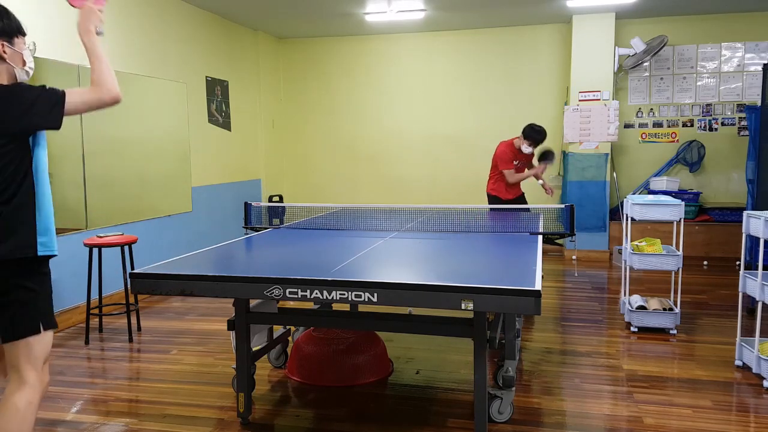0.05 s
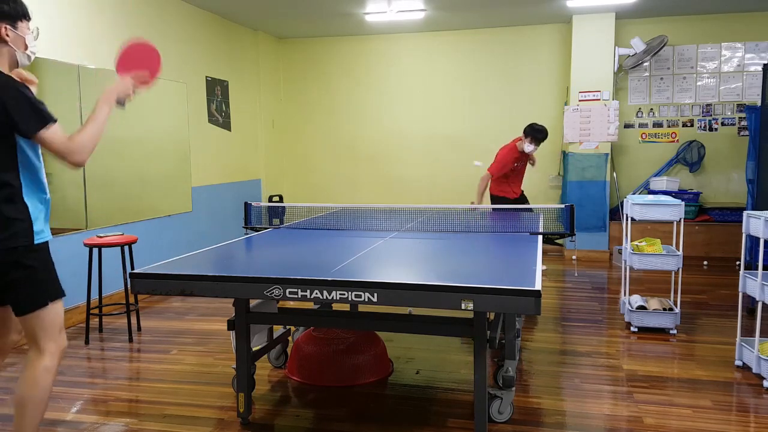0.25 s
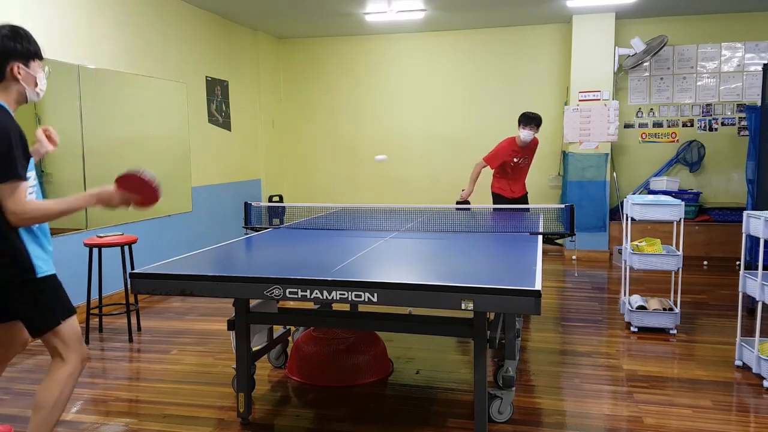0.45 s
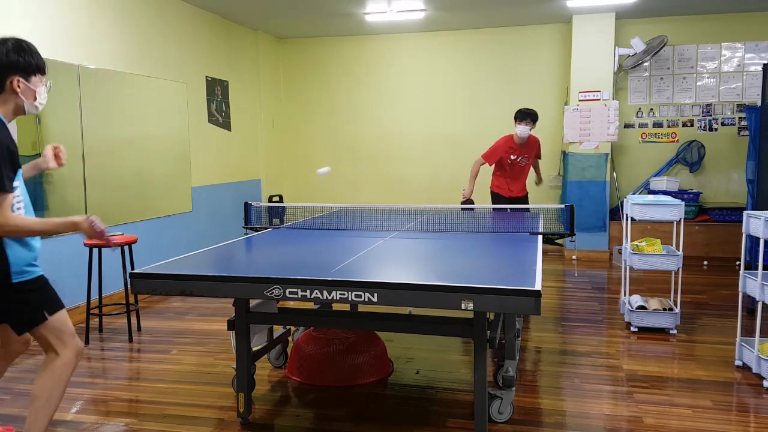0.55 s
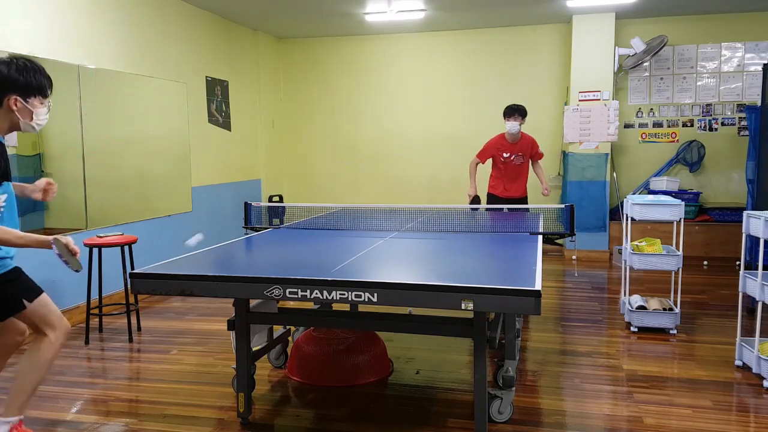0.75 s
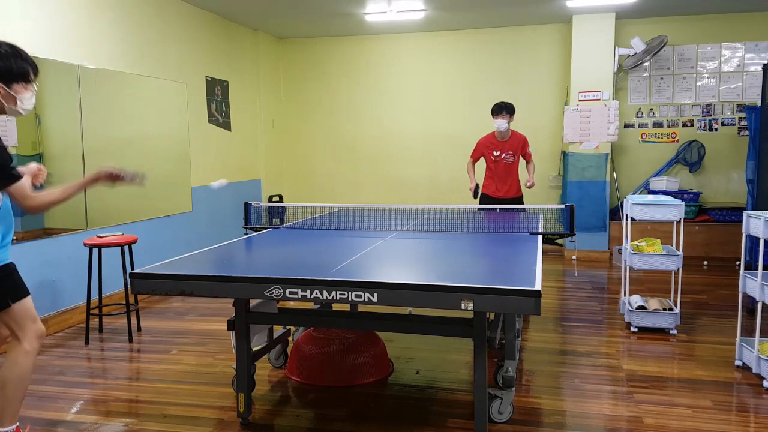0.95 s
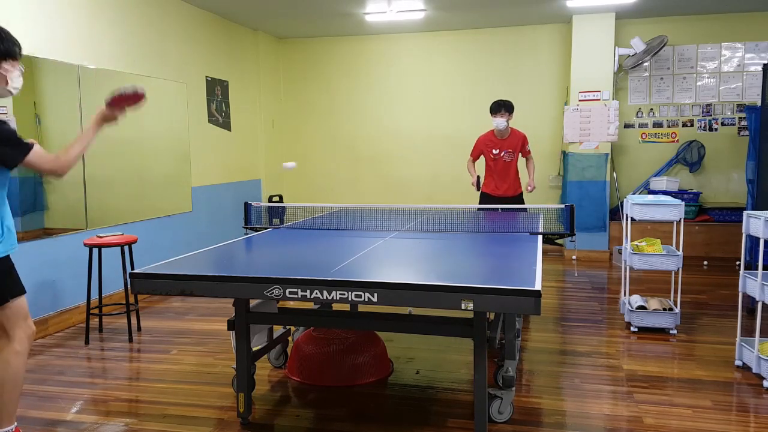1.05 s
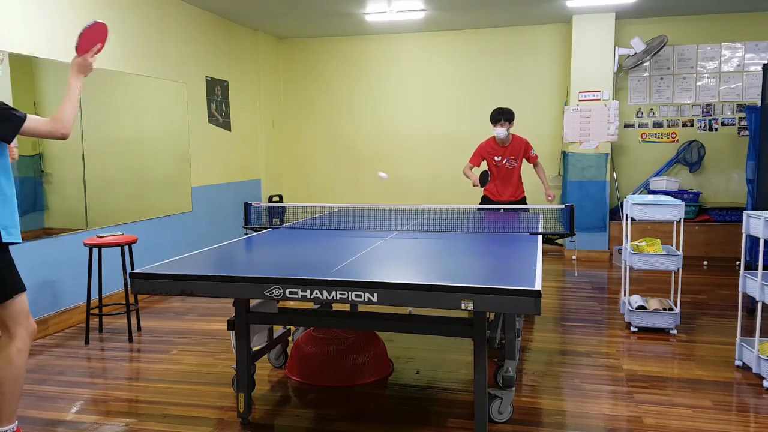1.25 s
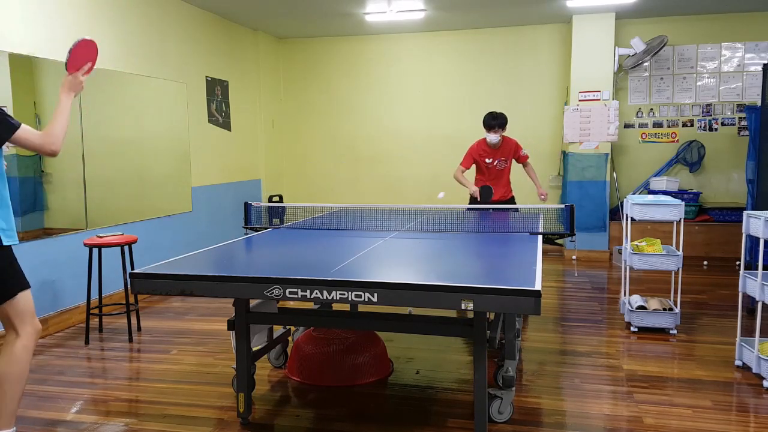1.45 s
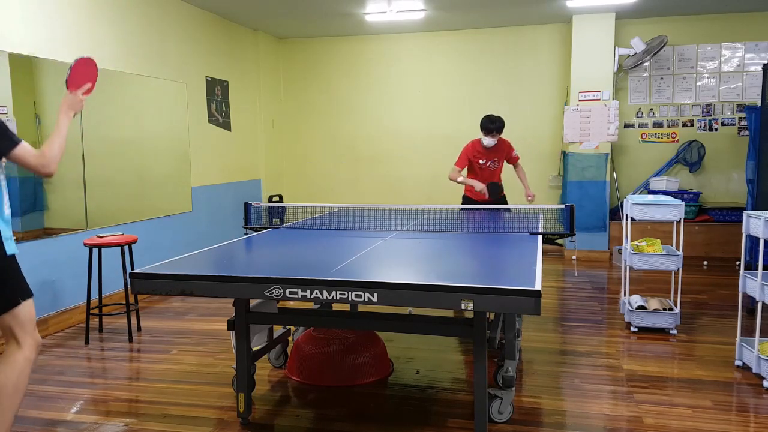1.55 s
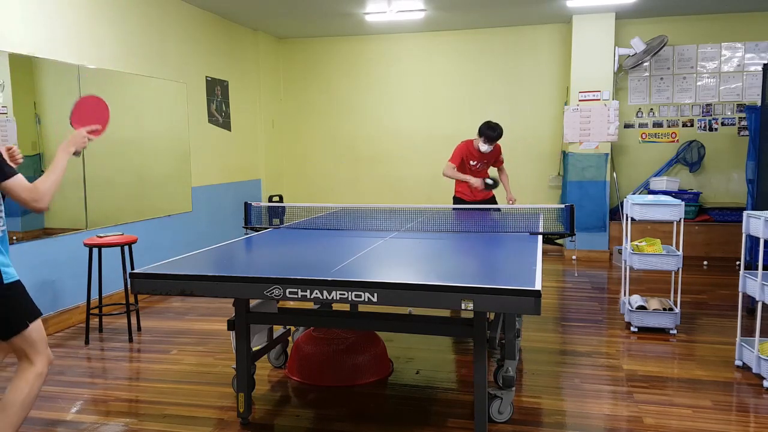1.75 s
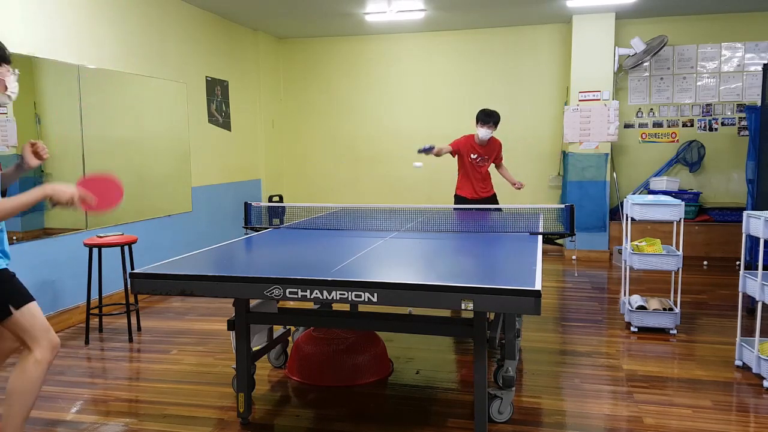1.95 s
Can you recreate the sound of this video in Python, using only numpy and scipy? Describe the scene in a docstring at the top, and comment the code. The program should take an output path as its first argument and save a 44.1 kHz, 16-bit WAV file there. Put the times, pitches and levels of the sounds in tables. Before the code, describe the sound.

A table tennis ball clicks off paddles and bounces on the table, three strokes in a steady rally. Feet stamp on a wooden floor, first farther away, then close by. Everything echoes in a hard-walled hall.

```python
"""A table tennis ball is hit back and forth: it knocks on table and paddles, and its thin shell pings.
The players stamp with their strokes, which sets the sprung wooden floor booming, and their rubber
soles slide softly on the varnish. Under it all lies the low rush of the room.
Most of the sound arrives as the echo of the hard-walled practice hall."""
import sys
import numpy as np
from scipy import signal
from scipy.fft import rfft, irfft, next_fast_len
from scipy.io import wavfile
from scipy.ndimage import uniform_filter1d, minimum_filter1d

SR = 44100
rng = np.random.default_rng(int(sys.argv[2]) if len(sys.argv) > 2 else 0)


def unload_audio(sound):
    """Save the sound as a 16-bit wav file, at the path given as the first command line argument."""
    columns = np.transpose(np.atleast_2d(sound))
    # keep every value between -1 and 1, then stretch to whole-number steps
    steps = np.round(np.clip(columns, -1, 1) * 32767)
    wavfile.write(sys.argv[1], SR, steps.astype(np.int16))


N = 88200
LEAD_IN, TAIL = SR // 4, SR * 3 // 2  # samples: room before time zero, length of a ring-out


def amp(db):
    """Turn decibels into a gain."""
    return 10 ** (np.asarray(db) / 20)


def unit(x):
    """Scale a sound to an energy of 1."""
    return x / np.sqrt(np.sum(x ** 2) + 1e-20)


def along(points, hz):
    """Read a curve of (Hz, value) points at the given pitches."""
    f, v = np.transpose(points)
    return np.interp(np.log(hz + 1), np.log(f + 1), v)


def add(track, s, sound):
    """Mix a stereo sound in at s seconds."""
    rest = track[:, LEAD_IN + round(s * SR):][:, :sound.shape[1]]
    rest += sound[:, :rest.shape[1]]


def knock(tone, size=4096):
    """One sharp knock whose tone follows a curve of (Hz, dB) points."""
    cepstrum = irfft(np.log(amp(along(tone, np.fft.rfftfreq(size, 1 / SR)))))
    cepstrum[1:size // 2] *= 2  # folding it in half packs the energy at the start
    cepstrum[size // 2 + 1:] = 0
    return unit(irfft(np.exp(rfft(cepstrum))))


def ring(notes, size, scatter_db=.8):
    """A struck object rings with fading notes, their levels a little different at each blow."""
    t = np.arange(size) / SR
    return sum(amp(db + scatter_db * rng.normal()) * np.exp(-np.log(1000) * t / fade_s)
               * np.sin(2 * np.pi * hz * t) for hz, db, fade_s in notes)


# How the hall reaches the ears. Each row: pitch in Hz, how alike both ears are (1 is the same).
EAR_LIKENESS = [(100, 0.97), (250, .87), (500, 0.81), (1000, -0.026), (2000, -0.077), (4000, 0.051),
                (9000, -0.049)]
# The hall's lean to one side. Each row: pitch in Hz, left level over right in dB.
EAR_BALANCE = [(120, -1.1), (400, 0.1), (2000, 0.64), (9000, 1.5)]
def diffuse(size):
    """Noise from all sides: nearly the same in both ears in the bass, wide in the treble."""
    hz = np.fft.rfftfreq(size, 1 / SR)
    turn = np.arccos(np.clip(along(EAR_LIKENESS, hz), -.99, .99)) / 2
    mid, side = rfft(rng.standard_normal((2, size))) * [np.cos(turn), np.sin(turn)]
    lean = amp(along(EAR_BALANCE, hz) / 2)
    return irfft(np.array([(mid + side) * lean, (mid - side) / lean]), size)


def rush(tone):
    """Steady noise from all sides with the given tone, at an average (rms) level of 1."""
    noise = irfft(rfft(diffuse(N)) * amp(along(tone, np.fft.rfftfreq(N, 1 / SR))), N)
    return noise / noise.std()


# The tone of the quiet room. Each row: pitch in Hz, relative level in dB.
ROOM_TONE = [(20, -25), (60, -3), (130, 0), (300, 1.5), (800, -8), (1600, -13), (3000, -30.5), (7000, -41),
             (16000, -39)]
def room_tone(level_db=-45.5):
    """The room's faint, low, steady rush."""
    return amp(level_db) * rush(ROOM_TONE)


# How long the hall echoes. Each row: pitch in Hz, seconds to fade by 60 dB.
HALL_FADE = [(50, 1.56), (140, 0.88), (300, 1.23), (600, 1.36), (1200, 1.092), (2000, 0.79), (3500, 0.68),
             (7000, 0.64), (10000, 0.47), (15000, 0.39)]
def hall(sound, direct_db, lead_ms=0, table_echo=0):
    """Sound arrives directly, off the walls, as a long wash and, if asked, off the table top."""
    early_db, early_s = -10, .043  # extra strength and life of the dense first echoes
    wall_count, walls_db, table_delay_s = 8, -19, .0022
    hz, t, spectrum = signal.stft(diffuse(TAIL), SR, nperseg=512)
    fade = np.exp(-np.log(1000) * t / along(HALL_FADE, hz)[:, None])
    echo = signal.istft(spectrum * fade, SR)[1] * np.sqrt(2 * np.log(1000) / SR)
    echo *= 1 + amp(early_db) * np.exp(-np.arange(echo.shape[1]) / SR / early_s)
    for delay, ear_gap in zip(rng.uniform(.007, .035, wall_count), rng.uniform(-.0002, .0001, wall_count)):
        echo[[0, 1], [int(delay * SR), int((delay + ear_gap) * SR)]] += amp(walls_db) / wall_count ** .5
    lead = round(lead_ms * SR / 1000)
    for ear, first in enumerate([max(-lead, 0), max(lead, 0)]):
        echo[ear, first] += amp(direct_db)
        echo[ear, first + round(table_delay_s * SR)] += amp(direct_db) * table_echo
    return signal.fftconvolve(sound[None], echo, axes=1)


# The tone of a sliding sole. Each row: pitch in Hz, relative level in dB.
SLIDE_TONE = [(500, -20), (2000, 7.5), (3500, -2.5), (7000, -12.5), (15000, -27)]
# Shoe slides. Each row: loudest moment in seconds, half length in seconds, level in dB.
SLIDES = [(0.17, 0.14, -52.5), (1.448, 0.038, -64.5)]
def shoe_slides():
    """Rubber soles slide on the varnish in soft swells of hiss."""
    t = np.arange(N) / SR
    swells = sum(amp(db) * np.exp(-((t - s) / half) ** 2 / 2) for s, half, db in SLIDES)
    return rush(SLIDE_TONE) * swells


# The floor's notes. Each row: pitch in Hz, relative level in dB, seconds to fade by 60 dB.
FLOOR_NOTES = [(100.3, -11.5, .9), (147, -1, 0.71), (162.2, 7.5, 0.4), (210.9, -5.5, 1),
               (237.3, -8.5, 0.91), (312.4, -14.5, 0.94)]
def floor_boom(rise_s=.018, left_over_right_db=-1.1):
    """The sprung boards swell into a low boom after a stamp."""
    rise = 1 - np.exp(-np.arange(TAIL) / SR / rise_s)
    ears = amp([[left_over_right_db / 2], [-left_over_right_db / 2]])
    return ears * rise * ring(FLOOR_NOTES, TAIL)


def crunch(sound, life_s):
    """Smear a knock into a short run of tiny uneven touches."""
    size = len(sound)
    touches = rng.standard_normal(size) * rng.exponential(size=size)
    touches *= np.exp(-np.arange(size) / SR / life_s)
    return unit(signal.fftconvolve(sound, touches)[:size])


# The tones of a stamp: deep push, thud, sole slap and the grit under each player's shoes.
# Each row: pitch in Hz, relative level in dB.
PUSH_TONE = [(20, -33), (38, -25), (52, -9.5), (85, -1.5), (125, 0), (220, -14.5), (600, -67), (5000, -100)]
THUD_TONE = [(20, -61.5), (90, -6), (140, 4.5), (215, -3), (300, -5.5), (420, -12), (700, -29.5),
             (2000, -43), (10000, -100)]
SLAP_TONE = [(60, -16.5), (300, 1.5), (550, 4.5), (900, 4), (1400, -4.5), (2100, 1), (3000, -15),
             (4500, -18.5), (9000, -40), (16000, -63)]
GRIT_TONES = {"far": [(800, -17.5), (2000, 1.5), (2700, 7.5), (3300, -0.5), (4400, -9.5), (6000, -6.5),
              (8500, -10.5), (11000, -15), (16000, -33)], "near": [(800, -25), (2500, -5), (3600, -1.5),
              (4700, -1.5), (6500, -9.5), (9500, -10.5), (12000, -11), (16000, -23)]}
# How strongly thud and slap arrive directly. Each entry: player, gain in dB.
DIRECT_THUD = {"far": -11.5, "near": -1.5}
DIRECT_SLAP = {"far": -13.5, "near": -8}
# Heels and soles landing. Each row: start in seconds, player, then levels in dB of the
# push, thud, floor boom, slap and grit.
STAMPS = [(0.252, "far", -9, 15.5, -39, 10.5, -8.5), (0.265, "far", -23, 4, -16.5, 12.5, 5.5),
          (0.2732, "far", -9, 18.5, -6.5, 13.5, 6), (.385, "far", 7, 6, -29.5, -21, -52),
          (.835, "near", -21, -16, -36, -40, -48), (.904, "near", 14.5, 16.5, -34, 4.5, -6),
          (0.9096, "near", 11, 15.5, -33, 9.5, -7), (.938, "near", 4.5, 2, -35, 2, -12),
          (0.946, "near", 12.5, 14.5, -28.5, 2.5, -10.5)]
def stamps():
    """A foot pushes the floor, slaps it as the sole rolls down, crunches grit and rings the boards."""
    track = np.zeros((2, LEAD_IN + N))
    push, thud, slap = knock(PUSH_TONE), knock(THUD_TONE), knock(SLAP_TONE)
    for s, player, push_db, thud_db, boom_db, slap_db, grit_db in STAMPS:
        sole = unit(slap + amp(-2) * crunch(slap, life_s=.003))
        grit = crunch(knock(GRIT_TONES[player]), life_s=.0047)
        add(track, s, hall(amp(push_db) * push + amp(thud_db) * thud, DIRECT_THUD[player]))
        add(track, s, hall(amp(slap_db) * sole + amp(grit_db) * grit, DIRECT_SLAP[player]))
        add(track, s, amp(boom_db) * floor_boom())
    return track[:, LEAD_IN:]


# The ball's notes. Each row: pitch in Hz, relative level in dB, seconds to fade by 60 dB.
BALL_NOTES = [(7200, -17, .004), (8620, 0, .008), (10600, 1, .0045), (11400, -1, .0025), (12400, -5, .0035),
              (14000, -14, .003)]
def ball_ping(db_per_octave, rise_s=.0003, size=4096):
    """The hollow shell rings briefly; more dB per octave makes it brighter."""
    lowest_hz = BALL_NOTES[0][0]
    notes = [(hz, db + db_per_octave * np.log2(hz / lowest_hz), fade_s) for hz, db, fade_s in BALL_NOTES]
    rise = 1 - np.exp(-np.arange(size) / SR / rise_s)
    return unit(ring(notes, size) * rise)


# The tone of the table top. Each row: pitch in Hz, relative level in dB.
TABLE_TONE = [(80, -15), (250, -6.5), (570, 1), (1100, 3.5), (1900, 0), (2700, -19), (3300, -14),
              (3900, -20.5), (4500, -28), (6500, -32.5), (16000, -44)]
# Bounces. Each row: start in seconds, knock and ping levels in dB, ping brightness in dB per octave,
# gains in dB of the direct knock and direct ping, head start of the left ear in milliseconds.
TABLE_BOUNCES = [(-.045, 5.5, -10, 6, -13, -11, 0), (0.861, 9, -5, 16, -32, -3.5, 0),
                 (1.504, 6, -6, 6, -14, -36, 0)]
def table_bounces():
    """The ball knocks on the table, and the blow rings its shell."""
    track = np.zeros((2, LEAD_IN + N))
    table = knock(TABLE_TONE)
    for s, knock_db, ping_db, brightness, direct_db, direct_ping_db, lead_ms in TABLE_BOUNCES:
        add(track, s, hall(amp(knock_db) * table, direct_db, lead_ms))
        add(track, s, hall(amp(ping_db) * ball_ping(brightness), direct_ping_db, lead_ms))
    return track[:, LEAD_IN:]


# The tones of the paddle's knock and its rubber's click. Each row: pitch in Hz, relative level in dB.
PADDLE_TONE = [(30, -42), (200, -23.5), (620, -10.5), (810, 0), (1000, 3.5), (1600, 2.5), (2200, -7),
               (3000, -23), (4300, -31), (7000, -34), (16000, -34)]
CLICK_TONE = [(1000, 4), (4000, -29.5), (7000, -63), (9000, 3), (14500, -6.5), (16500, -6)]
# The paddle blade's notes. Each row: pitch in Hz, relative level in dB, seconds to fade by 60 dB.
BLADE_NOTES = [(836, 17, 0.057), (1163, 27, 0.0083), (1526, -35.5, 0.036), (2150, 5, 0.036)]
# Strokes. Each row: start in seconds, knock level in dB, hardness as extra treble in dB, levels in dB
# of blade, ping and click, direct gain in dB, head start of the left ear in milliseconds.
STROKES = [(.2049, 12.5, 4, 4.5, -11.5, -6, -11.5, -.1), (0.9827, -0.5, -1, -5.5, -28, -15.5, -1, -.1),
           (1.8495, 6, -1.5, -5, -40, -10.5, -12.5, -.05)]
def paddle_hits(treble_from_hz=1370):
    """The ball clicks on the rubber and rings the blade; a harder stroke sounds brighter."""
    track = np.zeros((2, LEAD_IN + N))
    click = knock(CLICK_TONE)
    for s, knock_db, hard_db, blade_db, ping_db, click_db, direct_db, lead_ms in STROKES:
        tone = [(hz, db + hard_db * np.clip(np.log2(hz / treble_from_hz), 0, 1)) for hz, db in PADDLE_TONE]
        paddle = knock(tone)
        blade = unit(signal.fftconvolve(paddle, ring(BLADE_NOTES, len(paddle)))[:len(paddle)])
        ping = ball_ping(db_per_octave=-35)  # soft rubber hardly rings the ball's upper notes
        hit = amp(knock_db) * paddle + amp(blade_db) * blade + amp(ping_db) * ping + amp(click_db) * click
        add(track, s, hall(hit, direct_db, lead_ms, table_echo=amp(-1)))
    return track[:, LEAD_IN:]


def scene():
    """Ball and feet over the rush of the room."""
    return table_bounces() + paddle_hits() + stamps() + shoe_slides() + room_tone()


def record(dry, ceiling=.9, smooth_s=.004, top_hz=16000):
    """A limiter smoothly turns down the loudest stamps, then the highest treble is cut off."""
    span = int(smooth_s * SR)
    gain = ceiling / np.maximum(np.abs(dry).max(axis=0), ceiling)
    limited = dry * uniform_filter1d(minimum_filter1d(gain, 2 * span), span)
    padded = np.pad(limited, ((0, 0), (0, SR // 2)), mode="reflect")
    size = next_fast_len(N + SR)
    kept = np.fft.rfftfreq(size, 1 / SR) < top_hz
    return irfft(rfft(padded, size) * kept, size)[:, :N]


dry = scene()
out = record(dry)
unload_audio(out)
```